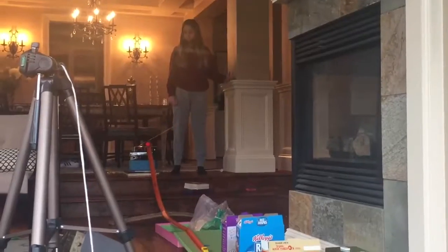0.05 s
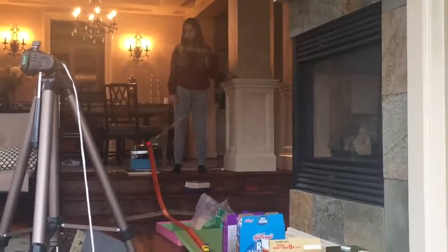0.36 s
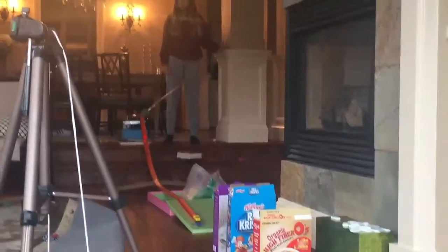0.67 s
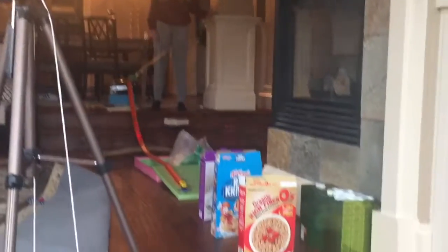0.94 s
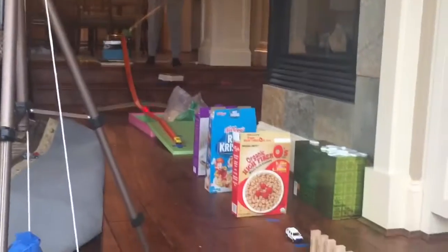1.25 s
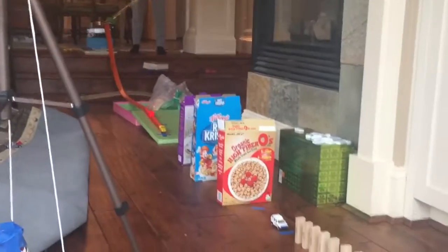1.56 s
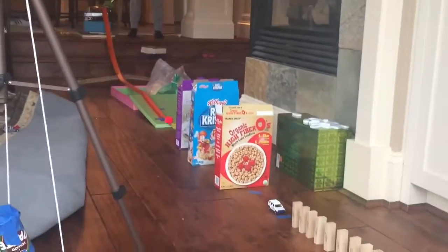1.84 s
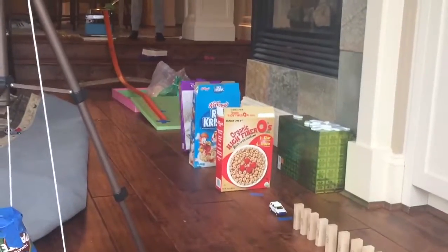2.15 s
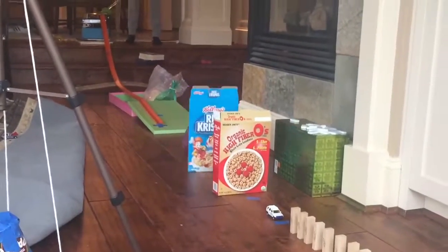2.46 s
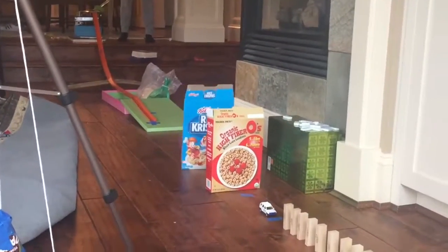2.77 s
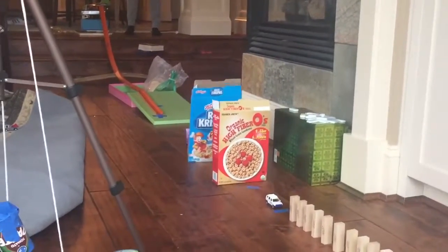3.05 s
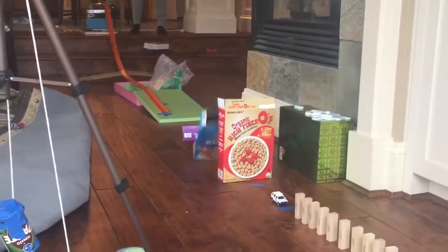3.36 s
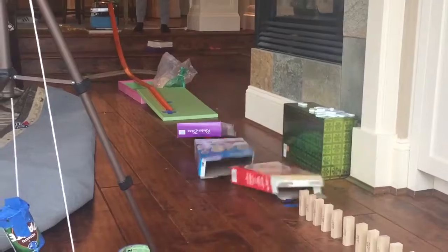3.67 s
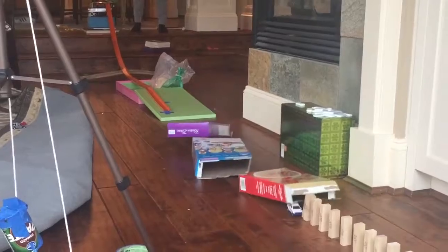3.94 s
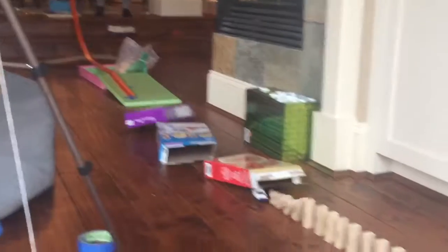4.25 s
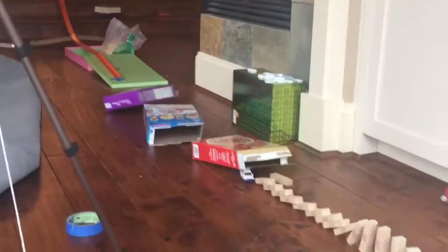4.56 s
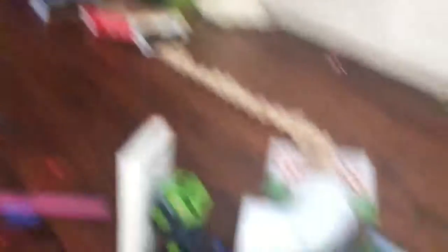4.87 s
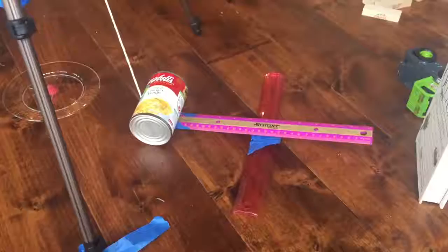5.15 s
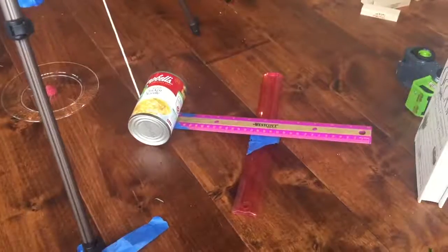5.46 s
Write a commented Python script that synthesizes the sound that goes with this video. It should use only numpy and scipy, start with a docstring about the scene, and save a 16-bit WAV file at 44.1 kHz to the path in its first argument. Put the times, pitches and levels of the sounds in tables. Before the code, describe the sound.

A toy car whirrs down a plastic track, a ball knocks across floorboards, cardboard boxes slap down and wooden blocks clack over.

```python
"""Living-room chain reaction

A homemade machine works its way closer across a wooden floor. A toy car is knocked loose, whirrs down
a plastic track and crashes; a ball rumbles over the boards; cereal boxes scrape and slap down; wooden
blocks clack over and plastic parts are struck. Then the sound turns dull and a faint ping is left.
Hits are noise bursts and damped rings; rolling and scraping are streams of tiny contacts."""
import sys
import numpy as np
from scipy import signal
from scipy.fft import rfft, irfft, next_fast_len
from scipy.io import wavfile
from scipy.ndimage import uniform_filter1d, map_coordinates

SR = 44100
rng = np.random.default_rng(int(sys.argv[2]) if len(sys.argv) > 2 else 0)


def store_wav(level_fs):
    """Save 16-bit WAV to argv[1]."""
    pcm = np.round(np.clip(np.atleast_2d(level_fs), -1, 1) * 32767)
    wavfile.write(sys.argv[1], SR, pcm.T.astype(np.int16))


N = 247327
T = np.arange(N) / SR
HIT_T = T[:SR // 3]  # time axis of one hit

# Cue levels are set before each layer's trim and reverb; boom and crack are relative to the mids.
# Blocks toppling, then two bright clinks with the last plastic hit. Each row: start in seconds,
# level in dB, crack in dB, main ring in Hz, clink level in dB, clink pitch in Hz.
CLACKS = [(4.2288, -34, -25.5, 1400, -57, 5600), (4.2939, -26.5, -19, 1580, -41.5, 7220),
          (4.348, -12.5, -26, 1770, -42, 9800), (4.4032, -23, -16.5, 1670, -42, 9140),
          (4.4300, -19, -30, 1850, -48, 9200), (4.4512, -26.5, -24, 1900, -52.5, 7600),
          (4.4915, -42, -11, 1690, -53, 7600), (4.544, -16.5, -12.5, 2443, -50, 9800),
          (4.5953, -21, -14.5, 1900, -38, 8850), (4.6326, -23.5, -15.5, 2120, -45, 7400),
          (4.7262, -22.5, -28, 1730, -60, 9700), (4.7767, -23.5, -34, 1170, -62, 7700),
          (4.8350, -21, -32.5, 1130, -57, 6820), (4.8731, -41.5, -11, 1390, -48.5, 9260),
          (4.8992, -43.5, 1, 1560, -40.5, 6820), (4.907, -30.5, -20, 1590, -44, 9200),
          (4.941, -42.5, -0.5, 1500, -48.5, 6700), (5.169, -46, -10, 2100, -36, 9620),
          (5.182, -31.5, -18, 2050, -41.5, 9620)]
# A block's body modes. Each row: pitch in Hz, width in Hz, gain in dB.
BLOCK_MODES = [(650, 220, -24.5), (1140, 260, -18.5), (1730, 470, 6), (2020, 93, 4.5), (2360, 130, -3)]
# Its stiff lengthwise modes. Each row: multiple of the clink pitch, width in Hz, gain in dB.
CLINK_MODES = [(1, 200, 6.5), (1.035, 410, -7), (0.93, 280, 1.5), (0.78, 350, -10), (1.33, 300, -15.5)]
# Tone of wood on wood. Each row: frequency in Hz, gain in dB.
WOOD_EQ = [(29, -39.5), (50, 2.5), (75, 5), (208, -2.5), (337, 4), (450, -14), (532, -2), (765, -2),
           (2380, -2), (3100, -14), (5670, -29), (7950, -46.5), (8970, -39), (10400, -47.5), (16000, -51)]
# A block's bright crack. Each row: frequency in Hz, gain in dB.
CRACK_EQ = [(2000, -14.5), (3600, 8.5), (5600, 2.5), (7500, -8.5), (9500, 0), (10800, -20), (16000, -19.5)]
# Fallen blocks and toys jostling. Each row: start and end in seconds, level in dB.
JOSTLE_SPANS = [(4.328, 4.908, -43), (5.051, 5.196, -42.5)]
# Hard plastic parts colliding. Each row: start in seconds, level, boom and crack in dB,
# main ring in Hz, edge ping in Hz, relative ping level in dB.
PLASTIC_HITS = [(1.748, -20.5, -5.5, -9.5, 1376, 6350, -8), (1.9675, -30.5, -6.5, -1.5, 2320, 11540, -5),
                (5.051, -14.5, -16, -6.5, 1570, 5160, -22), (5.078, -22, -17.5, -5, 2120, 4130, -10),
                (5.1665, -20.5, -8.5, -5, 2220, 4750, -8.5)]
# A plastic shell's modes. Each row: pitch in Hz, width in Hz, gain in dB.
SHELL_MODES = [(520, 130, 1.5), (1400, 110, -7), (2540, 150, 1), (2760, 300, 3.5), (3340, 250, -0.5),
               (4770, 730, -3.5), (6200, 560, -3.5)]
# Contact noise of plastic. Each row: frequency in Hz, gain in dB.
PLASTIC_EQ = [(60, -24), (180, -2.5), (500, -1.5), (850, -7), (1500, 1.5), (2600, 0), (3600, -7),
              (5500, -9), (7500, -26), (9500, -17.5), (11000, -29.5), (16000, -35)]
# The car's run down the track. Each row: time in seconds, body level in dB, treble level in dB.
CAR_LEVELS = [(0.58, -63.5, -74), (0.79, -61.5, -68), (0.86, -54.5, -58), (0.95, -55, -59),
              (1.06, -52, -54), (1.14, -54.5, -62), (1.25, -51, -53.5), (1.38, -53.5, -66),
              (1.5, -52.5, -59.5), (1.571, -51, -67.5)]
# The whirr follows the car's speed. Each row: time in seconds, pitch in Hz, relative level in dB.
WHIRR_CURVE = [(0.6, 200, -18), (0.781, 350, 0.5), (0.929, 450, -12.5), (1.099, 590, -9),
               (1.301, 530, -5.5), (1.5, 495, 1.5), (1.74, 480, 3.5)]
# The wheels' partials. Each row: multiple of the whirr pitch, width in Hz, gain in dB.
WHEEL_PARTIALS = [(0.58, 100, -10), (1, 230, -3), (2, 200, -10)]
# Light plastic rattles: the trigger, then the car after its hop.
# Each row: start, attack and end in seconds, level in dB, relative hiss in dB.
RATTLES = [(0.07, 0.17, 0.41, -67.5, 4), (1.632, 0.019, 1.724, -49, -10.5)]
# Tone of the track under the wheels. Each row: frequency in Hz, gain in dB.
TRACK_EQ = [(60, -7), (130, -4), (280, -1), (450, -1.5), (720, -12.5), (1000, -5), (1500, -4), (2000, -4.5),
            (2700, -2.5), (3600, -7.5), (5000, -15), (7000, -18), (9000, -22.5), (11500, -32.5),
            (16000, -37.5)]
# The track's resonances. Each row: pitch in Hz, shift in the bend in Hz, width in Hz, gain in dB.
TRACK_MODES = [(285, 0, 70, -13), (840, 130, 110, -13), (1850, -380, 200, -12), (2080, 720, 330, -3),
               (2900, 850, 600, -13), (6000, 1300, 1400, -15)]
# The car is knocked loose, then lands. Each row: start in seconds, level, boom and crack in dB.
TRACK_HITS = [(0.389, -35, -8.5, -13.5), (1.646, -34.5, -6.5, -9.5)]
# Tone of the struck track. Each row: frequency in Hz, gain in dB.
TRACK_HIT_EQ = [(50, -14.5), (130, 2), (190, 6), (300, 3), (420, -6.5), (700, -10.5), (1100, -5.5),
                (1700, -8.5), (2300, -2), (3000, -8), (3800, -27), (6000, -19), (9000, -29.5),
                (16000, -39.5)]
# Knocks on the floor. Each row: start in seconds, level, boom and crack in dB, hollow ring in Hz,
# relative ring level in dB.
FLOOR_HITS = [(1.772, -25, -4.5, -15.5, 490, -5.5), (1.889, -32.5, 2.5, -5, 416, 0.5),
              (1.992, -24.5, 1.5, -14.5, 290, -6.5), (2.105, -23.5, -1.5, -27, 412, -8.5),
              (2.124, -28, -7, -24, 749, -5), (2.158, -28, -10.5, -10.5, 293, -1.5),
              (2.246, -21.5, -9, -21.5, 634, -8), (2.274, -26.5, -6.5, -15, 703, -12.5),
              (2.355, -26.5, -12, -19, 1146, -10), (2.42, -31, -6, -14.5, 978, -6),
              (2.436, -27, 0, -22, 938, 2.5), (2.459, -30, -1, -14, 931, 6),
              (2.495, -24.5, -0.5, -17.5, 557.3, -5), (2.516, -31.5, 1, -21, 269, 8),
              (2.703, -45, 2.5, -6.5, 270, -12), (2.766, -44, 7, -30, 535, -1),
              (2.945, -52, 2.5, -20, 154, 4), (3.029, -71.5, 10.5, -24, 172, 2),
              (3.156, -68, 4.5, -25, 143, -3)]
# Tone of the floorboards. Each row: frequency in Hz, gain in dB.
BOARD_EQ = [(26, -42), (45, -10.5), (92, 3), (239, 2), (291, 2.5), (391, 3), (640, 3.5), (760, 3.5),
            (948, 4.5), (2410, -12.5), (2900, -21), (6600, -30), (7470, -36.5), (11900, -44), (16000, -55)]
# The ball rolling. Each row: start and end in seconds, level, boom and relative hiss in dB.
BALL_ROLLS = [(1.753, 2.225, -38.5, 0, -10.5), (2.34, 2.52, -35.5, -3, -27), (2.682, 2.856, -48, 4, -28)]
# Boxes slapping down. Each row: start in seconds, level, boom and crack in dB.
BOX_HITS = [(3.7295, -19, -2, -19), (3.742, -24.5, 1.5, -32.5), (3.752, -26, -16, -27.5),
            (3.783, -29.5, 5.5, -12.5)]
# Tone of a box landing flat. Each row: frequency in Hz, gain in dB.
SLAP_EQ = [(30, -40.5), (55, -5.5), (100, -5.5), (150, 4), (280, -2), (350, 5), (440, -6.5), (560, 4.5),
           (720, -11), (910, 0.5), (1100, -6.5), (1320, -5.5), (1600, -13), (2300, -13.5), (2900, -24.5),
           (3700, -26), (6000, -20.5), (10000, -45), (16000, -53)]
# Boxes scraping as they are shoved, tip and settle.
# Each row: start and end in seconds, level, boom and relative hiss in dB.
BOX_SCRAPES = [(2.085, 2.11, -47, -5.5, 4), (2.165, 2.225, -43.5, -24, -4), (2.38, 2.41, -47, -15, -5.5),
               (2.47, 2.495, -55.5, -1, -3), (3.41, 3.44, -45, -5, -10.5), (3.57, 3.72, -52, -2.5, -10.5),
               (3.79, 3.85, -38.5, -1, -16), (3.94, 4.0, -40.5, 3.5, -18), (4.05, 4.09, -61.5, 3.5, -15)]
# Body of sliding cardboard. Each row: frequency in Hz, gain in dB.
CARDBOARD_EQ = [(29, -29), (50, -1), (96, -6), (145, 3), (300, 4), (430, -3), (580, -3), (760, -11.5),
                (1100, -11), (2380, -14.5), (2880, -21), (3670, -24.5), (6000, -21), (10000, -53),
                (16000, -60.5)]
# Rasp of card on card. Each row: frequency in Hz, gain in dB.
RASP_EQ = [(3000, 5), (4500, -2.5), (6400, 2.5), (8000, -6), (10500, -10.5), (13500, -5.5), (16000, -17)]
# Hollow notes of the air in bumped boxes. Each row: start in seconds, level in dB, pitch in Hz.
BOX_NOTES = [(3.425, -47.5, 570), (3.502, -52.5, 200), (3.51, -51.5, 550), (3.785, -29, 585),
             (3.83, -40.5, 518), (3.917, -38, 510), (3.965, -38.5, 590), (3.988, -34.5, 547)]
# Soft, low thuds. Each row: start in seconds, level in dB, pitch in Hz.
FLOOR_THUDS = [(0.394, -47, 288), (1.414, -50.5, 71.6), (1.637, -49, 83.4), (2.245, -43.5, 72.2),
               (2.766, -38, 295), (2.858, -49.5, 88), (3.028, -59, 168), (3.156, -65.5, 135),
               (4.227, -38.5, 282), (4.955, -38, 349), (5.172, -43, 66), (5.172, -40.5, 360)]
# Bright ticks of toys and box flaps. Each row: start in seconds, level in dB, band centre in Hz.
TICK_HITS = [(0.884, -62, 10000), (0.8925, -59, 5460), (0.909, -49.5, 6200), (0.916, -58.5, 6650),
             (1.554, -60.5, 9440), (1.748, -30.5, 9300), (1.761, -43, 8000), (1.778, -39, 7970),
             (1.91, -42, 4520), (1.968, -35.5, 8700), (2.0697, -39.5, 7750), (2.103, -44.5, 4180),
             (2.17, -38.5, 4160), (2.3856, -43, 4000), (3.7297, -39, 7600), (3.754, -45, 6760),
             (3.7955, -44.5, 7800), (3.8354, -43, 4670), (3.95, -41, 7270), (4.004, -45, 5840),
             (4.045, -54.5, 5540), (4.059, -44, 4900), (4.095, -51.5, 6970), (5.051, -28, 3840),
             (5.1668, -32.5, 5200)]
# Modes of the metal ping. Each row: pitch in Hz, width in Hz, gain in dB.
METAL_MODES = [(1330, 17, -4), (1990, 25, -7), (2284, 27, 1), (2850, 35, -5), (2850, 77, 7), (3560, 62, 7),
               (3800, 31, -10)]
# Room tone. Each row: frequency in Hz, gain in dB.
AIR_EQ = [(15, -47.5), (25, -10), (64, 2), (206, -11), (344, -15.5), (2220, -21), (2550, -20),
          (2910, -23.5), (6050, -28.5), (16000, -33.5)]
# The room's decay. Each row: frequency in Hz, time to fall 60 dB in seconds.
REVERB_TIMES = [(100, 0.91), (260, 0.62), (700, 0.54), (1840, 0.65), (4850, 0.77), (12000, 0.41)]

FIRST_WET_DB, APPROACH_DB_PER_S = 6.5, 3  # the reverb send on hits falls as the machine comes closer


def clack(hz, crack_db, usual_hz=1850):
    """A hard knock: a main ring that pulls the other modes partway along, under a bright crack."""
    body = peak(ring([(hz, 290, 0)]), 0)
    body += peak(ring(BLOCK_MODES, np.sqrt(hz / usual_hz), jitter=0.074), -1)
    body += peak(colour(burst(t60=0.06), WOOD_EQ), -7)
    body = rebound(cut(body, [420, 3200], "band"), lag_s=0.0018, db=-10, rise_s=0.0007)
    crack = rebound(colour(burst(t60=0.053), CRACK_EQ), lag_s=0.0038, db=-13.5)
    return peak(body, 0) + peak(crack, crack_db)


def clink(hz):
    """A short, high ring, as of a block caught on its edge."""
    return rebound(cut(ring(CLINK_MODES, hz, jitter=0.0045), 4500, "high"), lag_s=0.004, db=-9)


def blocks_and_clinks(stray_hz=9200, stray_range_hz=900):
    """Blocks topple, clink and jostle; two more bright clinks come with the last plastic hit."""
    clacks, clinks = np.zeros((2, N))
    for s, level_db, crack_db, hz, clink_db, clink_hz in CLACKS:
        add(clacks, s, amp(level_db) * clack(hz, crack_db))
        add(clinks, s, peak(clink(clink_hz), clink_db))
    jostling = sum(amp(level_db) * envelope(start, end, attack_s=0.034, release_t60=0.4)
                   for start, end, level_db in JOSTLE_SPANS)
    clatter = colour(grains(per_s=300, spread_db=1.8), WOOD_EQ)
    clacks += unit(cut(clatter, 61, "high")) * jostling
    # faint stray clinks dot the first stretch of jostling
    start, end, _ = JOSTLE_SPANS[0]
    for when, pitch, softness in rng.random(size=(16, 3)):
        stray = clink(stray_hz + stray_range_hz * (pitch - .5))
        add(clinks, start + when * (end - start), peak(stray, -60 - 10 * softness))
    # these hits are close by, so the walls answer later and more evenly
    reverb = room(clacks + amp(-2) * clinks, first_s=0.0089, early_db=2.5)
    return clacks + clinks + amp(-6) * reverb


def plastic_crash(hz, edge_hz, edge_db):
    """A stiff plastic shell rings briefly under its contact noise, with a bright ping from its edge."""
    shell = peak(ring(SHELL_MODES, jitter=0.012), 0) + peak(ring([(hz, 130, 0)]), -2)
    edge = peak(cut(burst(t60=0.023), [edge_hz - 400, edge_hz + 400], "band", order=2), edge_db)
    contact = peak(colour(burst(t60=0.027), PLASTIC_EQ), 3)
    return rebound(shell + edge + contact, lag_s=0.0024, db=-18, rise_s=0.001)


def toy_car(release_t60=0.082, flutter_db=3.6, bend_s=1.14, bend_width_s=0.19):
    """Small wheels rush along the plastic track; their whirr climbs on the slope and sinks on the flat."""
    times, body_db, treble_db = np.transpose(CAR_LEVELS)
    descending = envelope(times[0] - .1, times[-1], 0.17, release_t60)
    body_gain = descending * amp(np.interp(T, times, body_db))
    treble_gain = descending * amp(np.interp(T, times, treble_db))
    for start, attack, end, level_db, hiss_db in RATTLES:
        rattling = amp(level_db) * envelope(start, end, attack, release_t60)
        body_gain += rattling
        treble_gain += rattling * amp(hiss_db)
    chatter = colour(grains(per_s=2500, spread_db=2.8), TRACK_EQ)
    times, whirr_hz, whirr_db = np.transpose(WHIRR_CURVE)
    pitch = np.interp(T, times, whirr_hz)
    whirr = sum(amp(db) * wavering(k * pitch, width) for k, width, db in WHEEL_PARTIALS)
    whirr *= amp(np.interp(T, times, whirr_db))
    in_bend = np.exp(-((T - bend_s) / bend_width_s) ** 2)
    track = sum(amp(db) * wavering(hz + shift * in_bend, width) for hz, shift, width, db in TRACK_MODES)
    body = amp(-2) * unit(cut(chatter, 3700, "low")) + whirr + track
    treble = unit(cut(chatter, 4500, "high"))
    car = floor_echo(body * body_gain + treble * treble_gain)
    car *= flicker(flutter_db, pace_hz=35)  # uneven wheels
    return amp(-3) * with_room(car, 0)


def floor_echo(x, top_lag_s=0.0031, lag_drop_s=0.001086, db=-14):
    """The floor mirrors the car: the lag shrinks as it descends, sweeping a comb filter upward."""
    lag_s = top_lag_s - lag_drop_s * ramp(start_s=0.58, length_s=0.92)
    mirrored = map_coordinates(x, [(T - lag_s) * SR])
    return (x + amp(db) * mirrored) / np.hypot(1, amp(db))


def track_knock():
    """A blow sets the whole length of the track rattling."""
    return colour(burst(t60=0.028), TRACK_HIT_EQ)


def board_knock(hz, ring_db, swell_s=0.0031):
    """Floorboards answer with a short, dense thump; a hollow ring swells just after it."""
    hollow = ring([(hz, 20, 0)]) * (1 - np.exp(-(HIT_T / swell_s) ** 2))
    thump = rebound(colour(burst(t60=0.03), BOARD_EQ), lag_s=0.0054, db=-19.5, rise_s=0.00057)
    return peak(thump, 0) + peak(hollow, ring_db)


def box_slap():
    """A hollow box lands flat and its panels flap against the floor."""
    return rebound(colour(burst(t60=0.08), SLAP_EQ), lag_s=0.0078, db=-6)


def ball_rumble():
    """The rolling ball drums the floorboards with small contacts."""
    rumble = rubbing(BALL_ROLLS, BOARD_EQ, BOARD_EQ, per_s=480, attack_s=0.04, release_t60=0.43)
    return amp(-4.5) * with_room(rumble, -5)


def ball_voice(low_hz=464.6, high_hz=955, growth_db=4):
    """Over its first two rolls the ball has a hollow voice that climbs and grows."""
    climb = ramp(start_s=1.97, length_s=0.45)
    rolling = envelope(BALL_ROLLS[0][0], BALL_ROLLS[1][1], attack_s=0.045, release_t60=0.3)
    voice = wavering(low_hz + (high_hz - low_hz) * climb, width_hz=93)
    return with_room(voice * amp(-51.5 + growth_db * climb) * rolling, -5)


def scraping_boxes():
    """Sliding cardboard makes dense contacts: a boxy body with a dry rasp on top."""
    scrape = rubbing(BOX_SCRAPES, CARDBOARD_EQ, RASP_EQ, per_s=4000, attack_s=0.017, release_t60=0.27)
    return amp(-3) * with_room(scrape, -3.5)


def booms(cues, width_hz, room_db):
    """A sprung floor or the air in a box swings for a few cycles."""
    x = np.zeros(N)
    for s, level_db, hz in cues:
        add(x, s, peak(ring([(hz, width_hz, 0)]), level_db))
    return with_room(x, room_db)


def ticks(octaves=1.41):
    """Light, hard contacts: only treble, which the room spreads into an even hiss."""
    direct, send = np.zeros((2, N))
    for s, level_db, hz in TICK_HITS:
        band = hz * 2 ** (np.array([-.5, .5]) * octaves)
        contact = rebound(burst(t60=0.003), lag_s=0.0028, db=-1.5)
        tick = peak(cut(contact, band, "band"), level_db)
        snap = unit(cut(1. * (HIT_T == 0), band, "band"))  # a clean impulse feeds the reverb
        add(direct, s, tick)
        add(send, s, snap * np.std(tick) * amp(FIRST_WET_DB - APPROACH_DB_PER_S * s))
    return direct + amp(-3) * room(send)


def drone(start_s=5.2, end_s=5.345, base_hz=172.6, bend_hz=39.7):
    """A short, low tone near the end that bends upward."""
    hz = base_hz + bend_hz * ramp(start_s, length_s=0.138) ** 2
    tone = unit(np.sin(2 * np.pi * np.cumsum(hz) / SR))
    return amp(-47) * tone * envelope(start_s, end_s, attack_s=0.051, release_t60=0.042)


def ping(start_s=5.503, swell_s=0.0012):
    """A faint, distant touch on something metal, heard mostly through the room."""
    metal = ring(METAL_MODES, jitter=0) * (1 - np.exp(-HIT_T / swell_s))
    touch = cut(burst(t60=0.032), [1200, 4200], "band")
    x = np.zeros(N)
    add(x, start_s, peak(metal, -57.5) + peak(touch, -58))
    return amp(-9) * x + amp(2) * room(x)


def room_tone():
    """The room's quiet air: a steady bed of dark noise."""
    return amp(-71.5) * unit(colour(rng.standard_normal(N), AIR_EQ))


def room(x, first_s=0.0039, early_db=3, early_s=0.015):
    """Reverb alone, at unit energy: strong early reflections, then a tail with a decay per octave."""
    t, tail = T[:SR], 0
    hz, t60s = np.transpose(REVERB_TIMES)
    for low_hz in 44 * 2 ** np.arange(9):
        octave = cut(rng.standard_normal(SR), [low_hz, 2 * low_hz], "band")
        t60 = np.interp(np.log(low_hz * np.sqrt(2)), np.log(hz), t60s)
        tail += octave * amp(-60 * t / t60)
    tail *= np.clip(t / first_s - 1, 0, 1)  # pre-delay
    tail *= 1 + amp(early_db) * np.exp(-t / early_s)
    return signal.fftconvolve(x, tail / np.sqrt(np.sum(tail ** 2)))[:N]


def with_room(x, room_db):
    """Direct sound plus its reverb."""
    return x + amp(room_db) * room(x)


def blows(cues, strike, trim_db, room_db):
    """Each blow has its own share of boom and crack; early, far ones arrive mostly through the room."""
    direct, send = np.zeros((2, N))
    for s, level_db, boom_db, crack_db, *voicing in cues:
        boom, mid, crack = registers(strike(*voicing))
        hit = peak(boom, boom_db) + peak(mid, 0) + peak(crack, crack_db)
        wet_db = FIRST_WET_DB - APPROACH_DB_PER_S * s
        add(direct, s, hit * amp(level_db + trim_db - max(wet_db, 0)))
        add(send, s, hit * amp(level_db + trim_db + wet_db))
    return direct + amp(room_db) * room(send)


def rubbing(spans, body_eq, surface_eq, per_s, attack_s, release_t60):
    """Rolling or sliding: a stream of small contacts shakes a body and hisses on its surface."""
    contacts = grains(per_s, spread_db=-2.5)
    boom, mid, _ = registers(colour(contacts, body_eq))
    _, _, hiss = registers(colour(contacts, surface_eq))
    hiss *= flicker(3.5, pace_hz=40)  # the surface catches and slips
    x = np.zeros(N)
    for start, end, level_db, boom_db, hiss_db in spans:
        blend = unit(mid) + amp(boom_db) * unit(boom) + amp(hiss_db) * unit(hiss)
        x += blend * amp(level_db) * envelope(start, end, attack_s, release_t60)
    return x


def dulled(x, treble_end_s=5.234, bass_end_s=5.36):
    """The treble drops away abruptly, and the bass ducks a moment later."""
    bright = np.clip((treble_end_s - T) / 0.014 + .5, 0, 1)
    bass = np.clip((bass_end_s - T) / 0.13 + .5, amp(-18), 1)
    return bright * x + (1 - bright) * bass * cut(x, 850, "low", order=8)


def ring(modes, pitch=1, jitter=0.0023):
    """Damped modes after one blow, each detuned at random; wider modes die sooner."""
    x = 0
    for hz, width_hz, db in modes:
        tuned_hz = hz * pitch * (1 + jitter * rng.standard_normal())
        x += amp(db) * np.exp(-np.pi * width_hz * HIT_T) * np.sin(2 * np.pi * tuned_hz * HIT_T)
    return x


def burst(t60):
    """The contact noise of one blow, fading 60 dB in t60 seconds."""
    return rng.standard_normal(len(HIT_T)) * amp(-60 * HIT_T / t60)


def rebound(x, lag_s, db, rise_s=0.00073):
    """A contact builds up in a moment and is followed by a weaker second touch."""
    x = x * (1 - np.exp(-HIT_T / rise_s))
    return x + amp(db) * np.interp(HIT_T - lag_s * rng.uniform(.6, 1.6), HIT_T, x, left=0)


def grains(per_s, spread_db):
    """Tiny contacts at random moments; a few are much louder, or softer if the spread is negative."""
    sizes = amp(spread_db * np.minimum(rng.exponential(size=N), 4))
    return (rng.random(N) < per_s / SR) * sizes * rng.choice([-1, 1], N)


def wavering(hz, width_hz):
    """A narrow, fluttering resonance around a moving centre; rms 1."""
    slow_noise = unit(cut(rng.standard_normal(N), width_hz / 2, "low", order=2))
    flutter = signal.hilbert(slow_noise, next_fast_len(N))[:N]
    return np.real(flutter * np.exp(2j * np.pi * np.cumsum(hz) / SR))


def flicker(depth_db, pace_hz):
    """A gain that wobbles at random."""
    return amp(depth_db * unit(cut(rng.standard_normal(N), pace_hz, "low")))


def envelope(start_s, end_s, attack_s, release_t60):
    """Swell from the start, hold until the end, then die away."""
    return ramp(start_s, attack_s) ** 2 * amp(-60 * np.maximum(T - end_s, 0) / release_t60)


def ramp(start_s, length_s):
    """Rise evenly from 0 to 1 and stay there."""
    return np.clip((T - start_s) / length_s, 0, 1)


def colour(x, eq, size=4096):
    """Minimum-phase EQ through (Hz, dB) points."""
    hz, db = np.transpose(eq)
    bin_hz = np.fft.rfftfreq(size, 1 / SR)
    log_gain = np.log(amp(np.interp(np.log(bin_hz + 1), np.log(hz), db)))
    cepstrum = irfft(log_gain)[:size // 2]
    cepstrum[1:] *= 2
    impulse = irfft(np.exp(rfft(cepstrum, size)))
    return signal.oaconvolve(x, impulse)[:len(x)]


def registers(x):
    """Split into boom, mids and treble."""
    return cut(x, 600, "low"), cut(x, [600, 3000], "band"), cut(x, 3000, "high", order=5)


def cut(x, hz, kind, order=3):
    """Low-, high- or band-pass."""
    return signal.sosfilt(signal.butter(order, np.clip(hz, 10, .48 * SR), kind, fs=SR, output="sos"), x)


def peak(x, db):
    """Set the level of the loudest 4 ms."""
    return x * amp(db) / np.sqrt(uniform_filter1d(x ** 2, 176).max())


def unit(x):
    """Scale to rms 1."""
    return x / np.sqrt(np.mean(x ** 2))


def amp(db):
    """Decibels to gain."""
    return 10 ** (np.asarray(db) / 20)


def add(out, s, x):
    """Mix x in at s seconds."""
    i = int(s * SR)
    out[i:i + len(x)] += x[:N - i]


def scene():
    """Mix the machine's stages, dull their ending, and add the room tone and the last ping."""
    machine = toy_car() + ball_voice() + ticks() + blocks_and_clinks() + drone()
    machine += booms(FLOOR_THUDS, width_hz=16, room_db=-3.5)
    machine += booms(BOX_NOTES, width_hz=22, room_db=-10.5)
    machine += ball_rumble() + scraping_boxes()
    machine += blows(FLOOR_HITS, board_knock, trim_db=-3.5, room_db=-1.5)
    machine += blows(TRACK_HITS, track_knock, trim_db=-3, room_db=0.5)
    machine += blows(BOX_HITS, box_slap, trim_db=-3, room_db=-3.5)
    machine += blows(PLASTIC_HITS, plastic_crash, trim_db=-5.5, room_db=2)
    return (dulled(machine) + room_tone() + ping())[None]


def record(dry, bottom_hz=28, top_hz=15750):
    """Master EQ: thin the deepest bass and cut the very top."""
    top_cut = signal.ellip(8, .2, 70, top_hz, fs=SR, output="sos")
    return signal.sosfilt(top_cut, cut(dry, bottom_hz, "high"))


dry = scene()
out = record(dry)
store_wav(out)
```